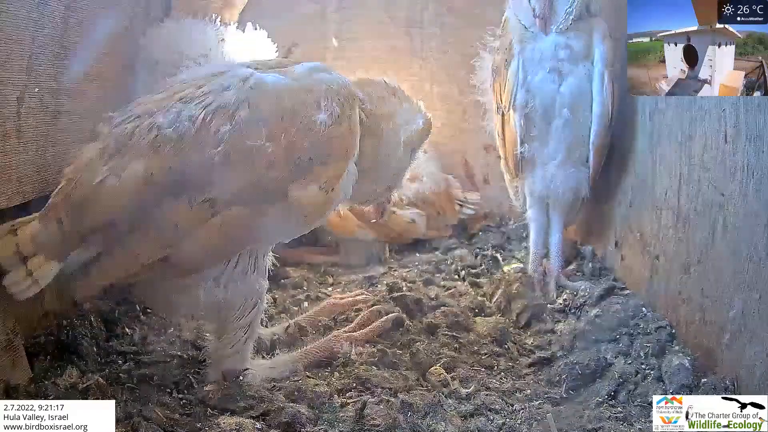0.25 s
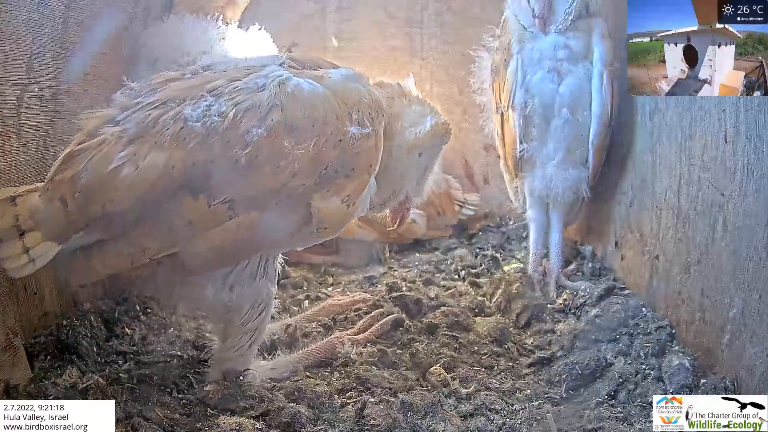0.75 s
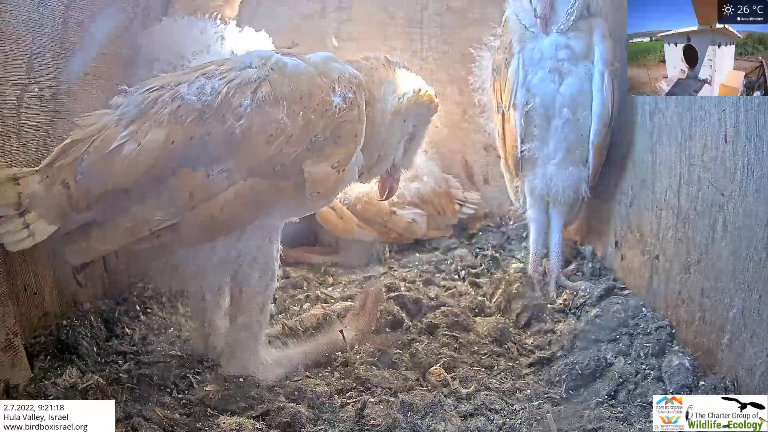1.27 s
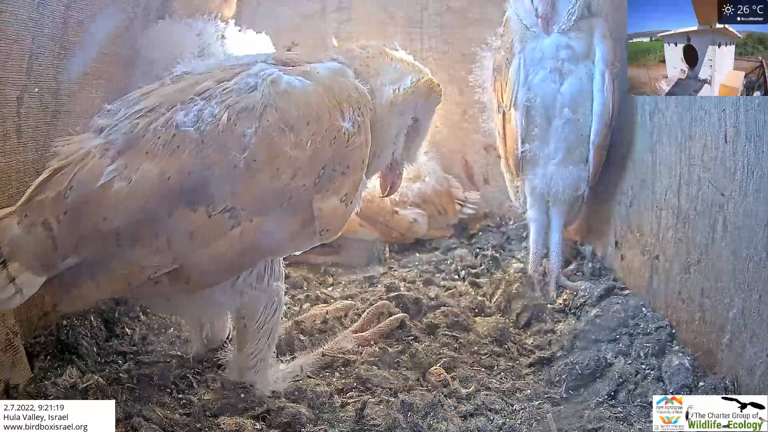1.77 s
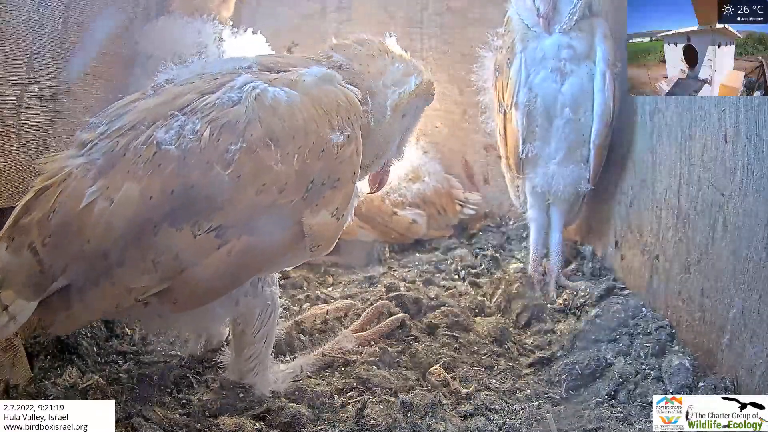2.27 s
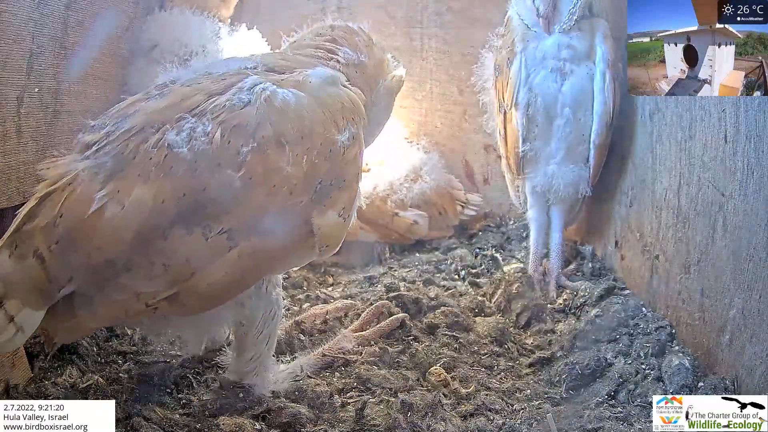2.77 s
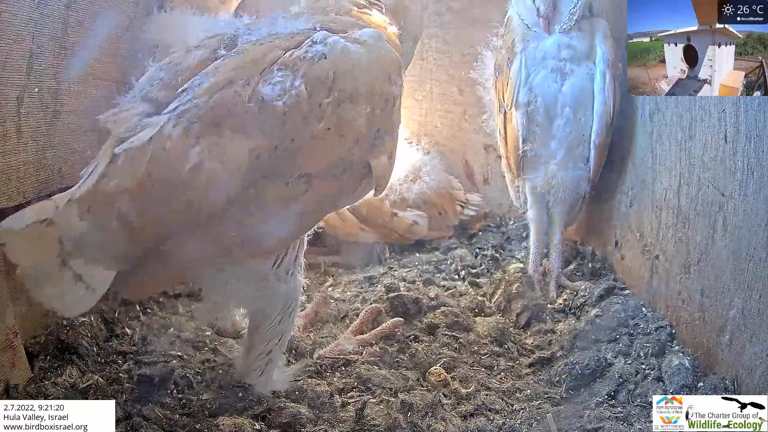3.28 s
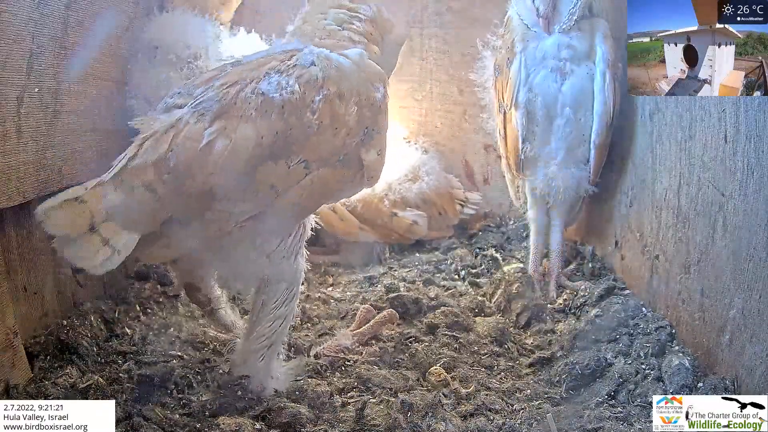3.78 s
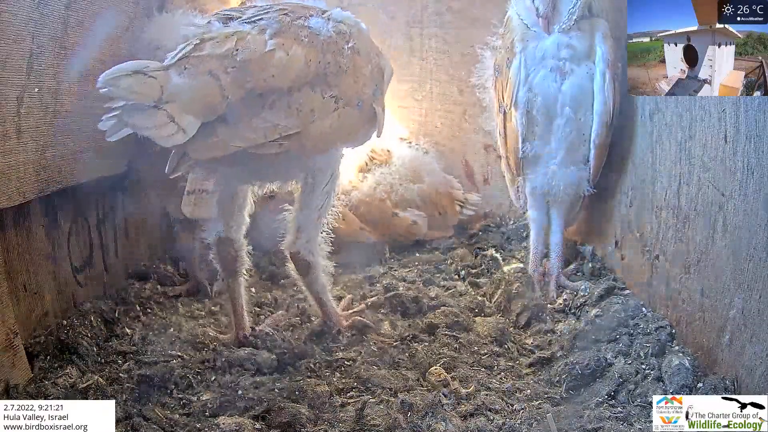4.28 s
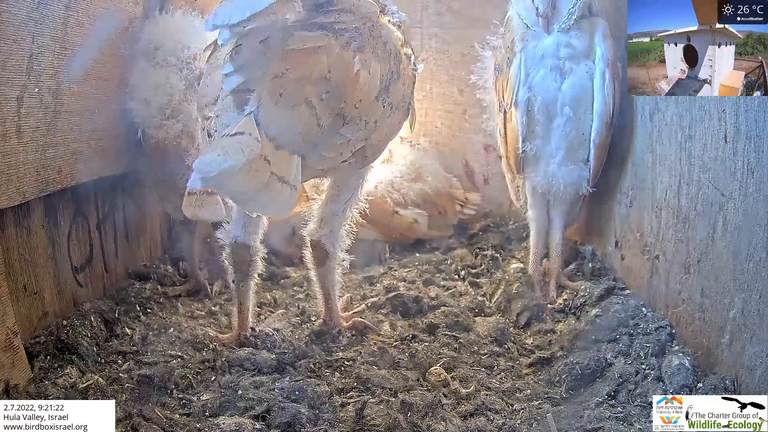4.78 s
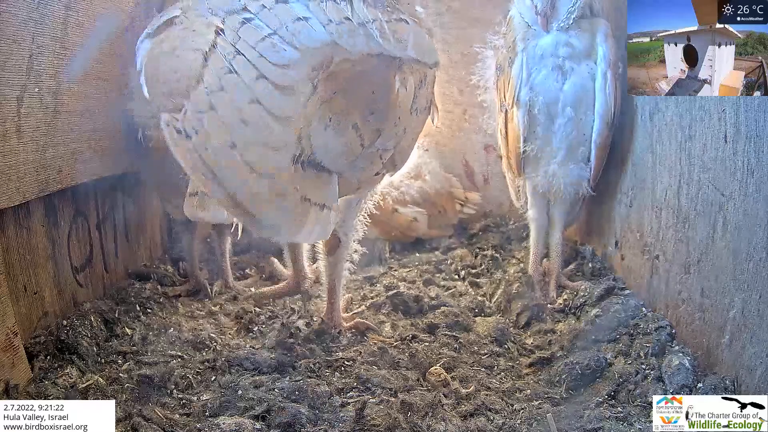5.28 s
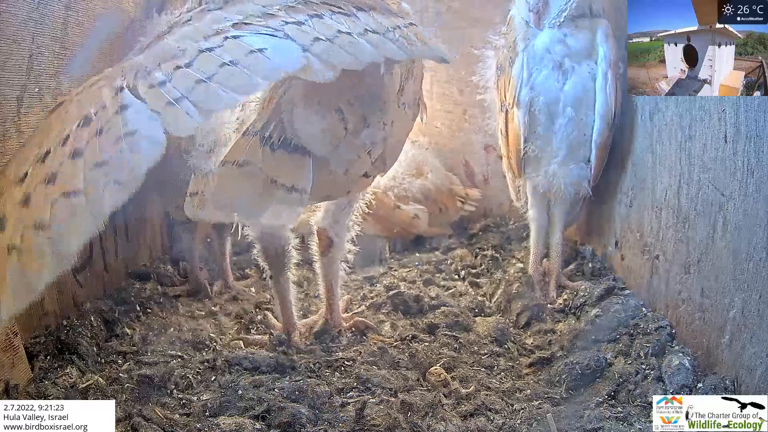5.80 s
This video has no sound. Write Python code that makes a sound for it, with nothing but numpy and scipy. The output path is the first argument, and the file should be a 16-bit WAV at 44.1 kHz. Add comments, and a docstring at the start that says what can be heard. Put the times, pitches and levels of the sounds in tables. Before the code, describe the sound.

A mono microphone inside a wooden nest box picks up a very quiet, boxy outdoor hush with deep rumble and faint hiss. Low wind buffets swell irregularly in the first three seconds, then fade. Young owls step on the boards: dull, hollow thuds with short woody knocks and scratchy claw ticks. Two quick thumps come at 0.0 and 0.15 s, others around 0.9, 1.05 and 1.3, and a very soft one at 1.8. After a pause, the loudest, boomiest thud lands at 3.2 with a crisp claw scratch, then medium thumps at 3.75 and 4.1. Tiny dry ticks fall between. A small bird outside gives very short, rising, thin cheeps about every half second from 0.3 to 3.6, growing slightly clearer. Faint, blurred high warbles drift from afar near 0.8, 2, 4.5 and 5.2. After 4.5 it is mostly calm, with one weak tap at 5.4.

```python
"""Young owls step and shift on the floor of a wooden nest box: each footfall sounds as a sum of
damped modes of boards and enclosed air, with bursts of shaped noise for the claws.
A small bird cheeps close outside in harmonic partials; others warble far away as narrow-band noise.
Wind is low-frequency noise with a board hum; the hush of the fields is noise coloured by the box."""
import sys
import numpy as np
from scipy import signal
from scipy.fft import rfft, irfft
from scipy.io import wavfile
from scipy.ndimage import uniform_filter1d

SR = 44100
rng = np.random.default_rng(int(sys.argv[2]) if len(sys.argv) > 2 else 0)


def store_pcm(level_fs):
    """Save levels as 16-bit WAV."""
    pcm = np.round(np.clip(level_fs, -1, 1) * 32767).astype(np.int16)
    wavfile.write(sys.argv[1], SR, np.atleast_2d(pcm).T)


N = 266672  # length in samples


def gain_of(db):
    """Decibel law: 20 dB is a factor of ten in amplitude."""
    return 10 ** (np.asarray(db) / 20)


def evened(x):
    """Power normalisation: scales a signal to rms 1."""
    return x / np.sqrt(np.mean(x ** 2) + 1e-20)


def add(mix, start_s, sound):
    """Linear superposition: adds a sound in place at its start, cut at the end of the mix."""
    part = mix[round(start_s * SR):][:len(sound)]
    part += sound[:len(part)]


def swell(t, rise_ms, t60):
    """Build-up and decay: a soft rise times an exponential loss of 60 dB per t60, with peak 1."""
    shape = (1 - np.exp(-1000 * t / rise_ms)) ** 2 * gain_of(-60 * t / t60)
    return shape / shape.max()


def coloured(size, points, modes=()):
    """Spectral shaping: white noise filtered to a curve plus resonant bumps or dips, at rms 1."""
    hz = np.fft.rfftfreq(size, 1 / SR)
    point_hz, point_db = np.transpose(points)
    # straight lines in dB over log frequency
    shape_db = np.interp(np.log(hz + .1), np.log(point_hz + .1), point_db)
    for centre_hz, width_hz, top_db in modes:
        shape_db = shape_db + top_db / (1 + (2 * (hz - centre_hz) / width_hz) ** 2)
    spectrum = rfft(rng.standard_normal(size)) * gain_of(shape_db)
    return evened(irfft(spectrum, size))


def ring(force, hz, t60):
    """Forced damped oscillator: a unit impulse excites a decaying sine of initial height 1."""
    radius = np.exp(-np.log(1000) / (t60 * SR))
    turn = 2 * np.pi * hz / SR
    numerator = [0, radius * np.sin(turn)]
    denominator = [1, -2 * radius * np.cos(turn), radius * radius]
    return signal.lfilter(numerator, denominator, force)


def echoed(call, wet_db, t60):
    """Outdoor reverberation: convolution with decaying noise of unit energy, added to the direct sound."""
    echoes = rng.standard_normal(8192) * gain_of(-60 * np.arange(8192) / (t60 * SR))
    trail = gain_of(wet_db) * signal.fftconvolve(call, echoes / np.linalg.norm(echoes))
    add(trail, 0, call)
    return trail


# Spectrum of the far low rumble: (f/Hz, relative level per Hz/dB)
RUMBLE_SPECTRUM = [(15, -19), (30, 12.5), (55, 7.5), (80, 4), (130, -34.5)]
# Spectrum of the outdoor hush: (f/Hz, relative level per Hz/dB)
HUSH_SPECTRUM = [(100, -49), (170, -32.5), (211, 4), (249, -2), (284, -0.5), (347, -4.5), (397, -9),
                 (424, -9), (509, -7), (823, -13.5), (1020, -29), (1230, -16.5), (2380, -14), (9000, -31.5),
                 (11700, -78), (19800, -120)]
# Resonances that the box lends the hush: (f/Hz, width/Hz, bump or dip level/dB)
BOX_COLOUR = [(300, 67, 2.5), (353, 73, 5), (499.5, 82, 8.5), (731, 184, 4.5), (982, 470, 5.5),
              (1580, 170, 1.5), (1800, 620, -3), (2150, 61, -10.5)]
HUSH_DB, RUMBLE_DB, HISS_DB = -70, -65.5, -91  # rms levels; the hush varies about its own


def hush():
    """Resonant filtering: the box colours a gently swelling hush, over low rumble and flat microphone hiss."""
    drift = uniform_filter1d(rng.standard_normal(N), 3000)
    drift = evened(uniform_filter1d(drift, 3000))
    level_db = HUSH_DB + 0.8 * drift
    rumble = gain_of(RUMBLE_DB) * coloured(N, RUMBLE_SPECTRUM)
    hiss = gain_of(HISS_DB) * rng.standard_normal(N)
    return gain_of(level_db) * coloured(N, HUSH_SPECTRUM, BOX_COLOUR) + rumble + hiss


# Course of the wind buffeting: (t/s, level/dB)
BUFFET_LEVELS = [(0.0, -49.5), (0.03, -45.5), (0.23, -38), (0.42, -54.5), (0.66, -44), (0.74, -55.5),
                 (1.53, -45.5), (1.56, -57), (2.02, -52.5), (2.05, -61), (2.21, -43), (2.71, -49.5),
                 (2.75, -59), (3.2, -58), (4.8, -67.5), (4.83, -56.5), (5.04, -63), (6.05, -64.5)]
# Spectrum of the buffeting: (f/Hz, relative level per Hz/dB)
BUFFET_SPECTRUM = [(0.59, -11), (1.0, 6.5), (16, 1.5), (24, -14.5), (35, -12), (55, -18), (77, -120)]
# Low modes of the boards: (f/Hz, relative gain/dB, t60/s)
BOARD_HUMS = [(105, -0.5, 0.14), (115, 2.5, 0.12), (134.6, -10, 0.35)]
HUM_DB = -65.5  # steady part of the hum
SHAKE_DB, SHAKE_T60, SHAKE_RISE_MS = -21, 0.79, 35  # extra hum after a footfall, dB against its floor level


def wind():
    """Random excitation: low noise buffets, and noise-driven board modes hum, louder after a footfall."""
    t = np.arange(N) / SR
    point_s, point_db = np.transpose(BUFFET_LEVELS)
    buffeting = gain_of(np.interp(t, point_s, point_db)) * coloured(N, BUFFET_SPECTRUM)
    force = rng.standard_normal(N)
    hum = evened(sum(gain_of(db) * ring(force, hz, t60) for hz, db, t60 in BOARD_HUMS))
    hum_gain = np.full(N, gain_of(HUM_DB))
    for start_s, _, floor_db, *_ in FOOTFALLS:
        shake = gain_of(floor_db + SHAKE_DB) * swell(t[:SR], SHAKE_RISE_MS, SHAKE_T60)
        add(hum_gain, start_s, shake)
    return buffeting + hum_gain * hum


# Far warbles: (t/s, length/s, first f/Hz, last f/Hz, level before fades and echoes/dB, blur/Hz)
FAR_WARBLES = [(0.828, 0.052, 4340, 3330, -78, 252), (1.754, 0.1, 5140, 5140, -86.5, 300),
               (1.99, 0.027, 4220, 3760, -83.5, 200), (2.056, 0.025, 3760, 3330, -80, 200),
               (2.155, 0.06, 4330, 4000, -80, 695), (2.202, 0.043, 3790, 3460, -79, 300),
               (4.425, 0.055, 4150, 4020, -81, 600), (4.478, 0.05, 3700, 3230, -78, 250),
               (4.54, 0.08, 5250, 5220, -88, 90), (4.87, 0.093, 5270, 5270, -87, 500),
               (4.904, 0.028, 1780, 1950, -81, 200), (5.161, 0.1, 3560, 3950, -85, 150),
               (5.198, .08, 6270, 5400, -87, 900), (5.21, 0.06, 4580, 4030, -80.5, 500),
               (5.257, 0.055, 3850, 3064, -76, 400), (5.652, 0.046, 3550, 3130, -79, 410),
               (5.92, 0.065, 5200, 5300, -89, 400)]


def warble(length, first_hz, last_hz, db, blur_hz):
    """Modulation: low-passed complex noise on a gliding carrier gives a far whistle smeared by distance."""
    size = int(length * SR)
    real, imaginary = rng.standard_normal((8192, 2)).T
    pole = np.exp(-np.pi * blur_hz / SR)
    smear = signal.lfilter([1], [1, -2 * pole, pole * pole], real + 1j * imaginary)[-size:]
    phase = 2 * np.pi * np.cumsum(np.linspace(first_hz, last_hz, size)) / SR
    whistle = evened((smear * np.exp(1j * phase)).real)
    call = gain_of(db) * whistle * signal.windows.tukey(size, .5)
    return echoed(call, wet_db=-4.0, t60=0.58)


# Close cheeps: (t/s, length/s, third partial's first f/Hz and top f/Hz, share of the note at the top,
#                third, second and fourth partial level before fades and echoes/dB)
CLOSE_CHEEPS = [(0.27, .048, 4010, 4910, .54, -76, -84, -78.5),
                (1.06, 0.022, 4340, 4770, 0.99, -81, -77, -99),
                (1.429, .03, 4320, 4750, 0.95, -77, -72.5, -93),
                (1.893, 0.026, 4450, 4780, 0.85, -79, -73, -94),
                (2.285, 0.03, 4110, 4835, 0.77, -73, -69, -89),
                (2.7, 0.0314, 4000, 4820, 0.83, -69, -69.5, -82),
                (3.15, 0.03, 4040, 4680, 0.94, -67.5, -71, -87),
                (3.629, .033, 3940, 4710, 0.83, -68.5, -72.5, -86)]
LOW_SWELL_DB = 5  # all but the third partial grow by this through the note
FIRST_DB = -9  # fundamental against the second partial
CHEEP_EDGES = 0.46  # share of the note spent fading in and out


def cheep(length, first_hz, top_hz, top_share, third_db, second_db, fourth_db):
    """Harmonic series: four partials follow one arched pitch, the fundamental weaker than the second."""
    share = np.arange(0, length, 1 / SR) / length
    third_hz = top_hz - (top_hz - first_hz) * (1 - share / top_share) ** 2
    phase = 2 * np.pi * np.cumsum(third_hz) / (3 * SR)  # of the fundamental
    low_db = second_db - LOW_SWELL_DB * (1 - share)
    levels = [low_db + FIRST_DB, low_db, third_db, fourth_db + low_db - second_db]
    note = np.zeros(len(share))
    for number, db in enumerate(levels, start=1):
        note += np.sqrt(2) * gain_of(db) * np.sin(number * phase)  # root 2: dB as rms
    return echoed(note * signal.windows.tukey(len(share), CHEEP_EDGES), wet_db=-7.5, t60=0.081)


# Spectrum of a claw on wood: (f/Hz, relative level per Hz/dB)
CLAW_SPECTRUM = [(600, -62), (1000, 2), (1500, 7.5), (2300, 6.5), (3200, 4.5), (4200, 1), (7000, 0),
                 (11000, -16), (15500, -20)]
# Lone ticks of claw or feather on dry litter: (t/s, level/dB, relative treble level/dB)
LONE_TICKS = [(0.8385, -75, 6), (1.0151, -78, 2), (1.331, -94, -5), (2.4736, -71, 7), (3.1572, -71, 9.5),
              (3.304, -76.5, 13), (3.732, -68, -2), (3.7746, -72, 3)]
SNAP_HZ, SNAP_WIDTH_HZ = 2930, 1400  # woody snap of a blunter tip
SNAP_PER_DB = 1.06  # snap dB gained for each dB of treble below zero


def tick(db, treble_db, rise_ms, t60):
    """Impact spectrum: a hard tip brightens the gritty noise burst, a blunt one adds a woody snap."""
    t = np.arange(2048) / SR
    roughness = evened(uniform_filter1d(rng.standard_normal(2048), 30))
    grit = evened(gain_of(3.0 * roughness))
    colour = [(hz, level_db + treble_db * (hz > 5000)) for hz, level_db in CLAW_SPECTRUM]
    snap = (SNAP_HZ, SNAP_WIDTH_HZ, -SNAP_PER_DB * min(treble_db, 0))
    return gain_of(db) * swell(t, rise_ms, t60) * grit * coloured(2048, colour, [snap])


# Footfalls: (t/s, knock level/dB, floor level/dB, then wall, panel and air level against the floor/dB,
#             claw level/dB, claw relative treble level/dB, claw t60/s,
#             second toe's delay/s and its level against the first/dB)
FOOTFALLS = [(0.035, -44.5, -40, 0, -4.5, -9.5, -67, 5, 0.09, .007, -5.5),
             (0.15, -47.5, -45.5, 3.5, -6.5, 0, -67.5, 1, 0.062, .005, -4.5),
             (0.264, -71, -47.5, -2.5, -11.5, -21, -90, -2, 0.04, .005, -5),
             (0.878, -45, -38, 0, -6, 0, -58, -8, 0.032, .004, 10),
             (1.042, -63, -44.5, -7, -14.5, -14.5, -66.5, -9, 0.015, .005, -8),
             (1.315, -46.5, -44.5, 3, -1.5, 2, -68.5, 2, 0.043, .005, 5),
             (1.785, -82, -56, -2, -14, -8, -89, -2, 0.04, .005, -5),
             (3.179, -33.5, -31.5, -7, -2, -4, -54, 3.5, 0.03, .006, -5.5),
             (3.302, -59, -60, 13, 0, 3, -82, -2, 0.045, .012, 3.5),
             (3.348, -57, -54, -1, -9, -11, -80, -2, 0.04, .005, -7),
             (3.747, -46, -40, -26, -4, 0.5, -68, 1, 0.037, .0065, 5),
             (3.943, -75, -60.5, -7, -13, -27, -85, -2, 0.04, .005, -5),
             (4.073, -45, -40, -1, -4, 1.5, -59.5, 0.5, 0.043, .004, -10.5),
             (5.378, -51.5, -61, -8, 6, 3.5, -70.5, 0, 0.055, .006, -9),
             (5.51, -79, -63, -14, -10, -14, -84, -2, 0.04, .005, -5)]
# Modes of the box: (part, f/Hz, peak level against its part/dB, t60/s, rise/ms)
BOX_MODES = [("floor", 120.4, 10.04, 0.1, 9.2), ("joist", 95, 4.2, 0.65, 8.1),
             ("wall", 138, -2.3, 0.37, 2.5), ("panel", 209, 0.21, 0.19, 12.5),
             ("air", 295.4, -3.7, 0.13, 3.8), ("air", 335, -3.9, 0.13, 3.85),
             ("knock", 389, -12, 0.12, 1.8), ("knock", 499, -1.7, 0.024, 2.2),
             ("knock", 562, -12, 0.057, 1.24), ("knock", 730, -10.5, 0.046, 1.86),
             ("knock", 835, -23, 0.084, 0.84)]
JOIST_DB = -16.5  # against the floor, for every footfall
CLAW_RISE_MS = 0.77


def step(knock_db, floor_db, wall_db, panel_db, air_db, claw_db, treble_db, claw_t60, toe_s, toe_db):
    """Modal superposition: weight swells in boards and air while two toes knock and their claws tick."""
    t = np.arange(SR // 2) / SR
    parts_db = dict(floor=floor_db, joist=floor_db + JOIST_DB, wall=floor_db + wall_db,
                    panel=floor_db + panel_db, air=floor_db + air_db, knock=knock_db)
    footfall, knock = np.zeros((2, len(t)))
    for part, hz, db, t60, rise_ms in BOX_MODES:
        envelope = gain_of(parts_db[part] + db) * swell(t, rise_ms, t60)
        mode = envelope * np.sin(2 * np.pi * hz * t)
        add(knock if part == "knock" else footfall, 0, mode)
    for delay_s, db in [(0, 0), (toe_s, toe_db)]:  # first and second toe
        add(footfall, delay_s, gain_of(db) * knock)
        add(footfall, delay_s, tick(claw_db + db, treble_db, CLAW_RISE_MS, claw_t60))
    return footfall


def scene():
    """Linear superposition of hush, wind, birds and feet in one channel."""
    mix = hush() + wind()
    for start_s, *how in FAR_WARBLES:
        add(mix, start_s, warble(*how))
    for start_s, *how in CLOSE_CHEEPS:
        add(mix, start_s, cheep(*how))
    for start_s, *how in LONE_TICKS:
        add(mix, start_s, tick(*how, rise_ms=0.64, t60=0.021))
    for start_s, *how in FOOTFALLS:
        add(mix, start_s, step(*how))
    return mix[None]


def record(dry):
    """Band limitation: a linear-phase low-pass filter removes the treble above 15680 Hz."""
    low_pass = signal.firwin(1023, 15680, window=("kaiser", 9), fs=SR)
    return signal.oaconvolve(dry, low_pass[None], "same")


dry = scene()
out = record(dry)
store_pcm(out)
```